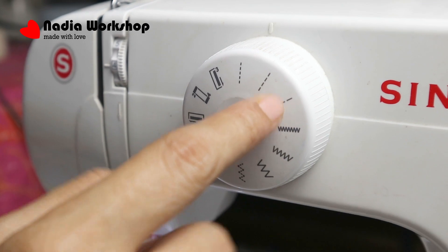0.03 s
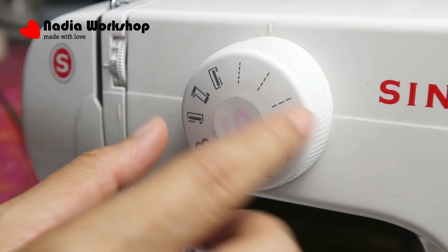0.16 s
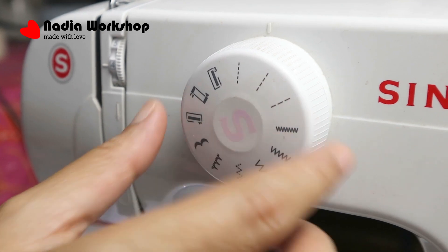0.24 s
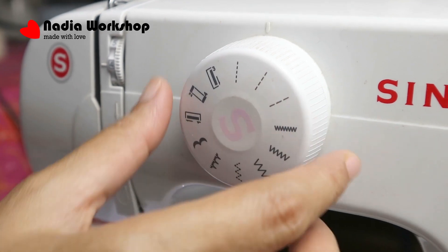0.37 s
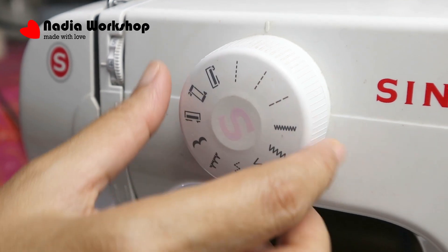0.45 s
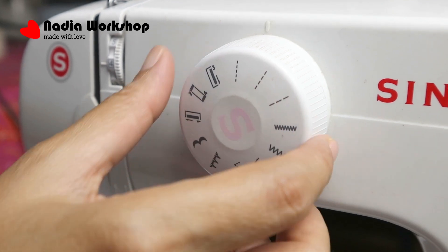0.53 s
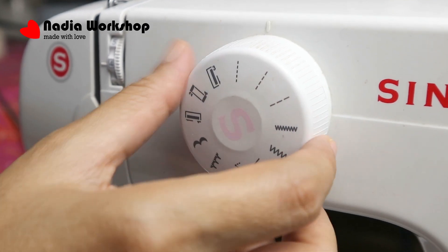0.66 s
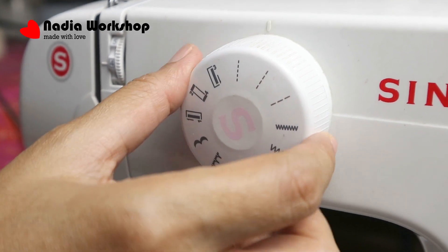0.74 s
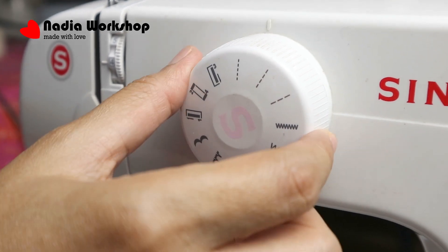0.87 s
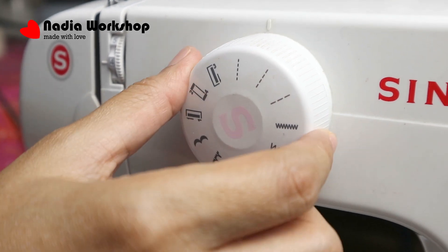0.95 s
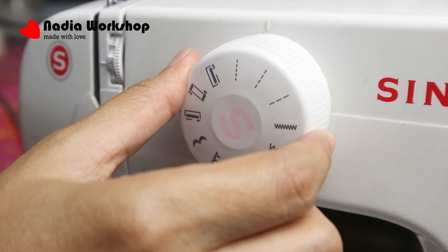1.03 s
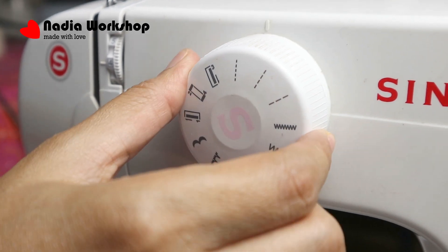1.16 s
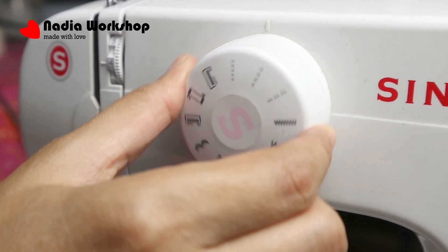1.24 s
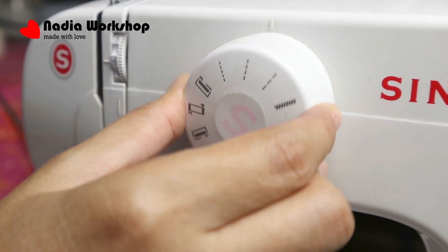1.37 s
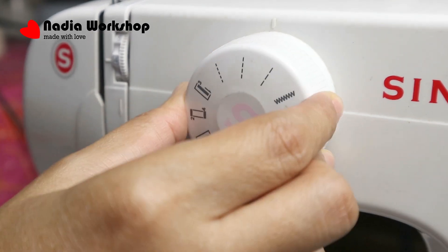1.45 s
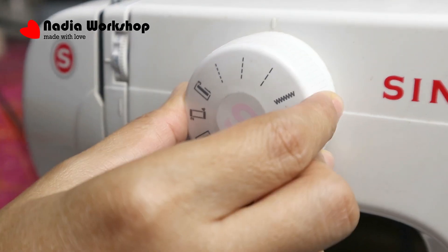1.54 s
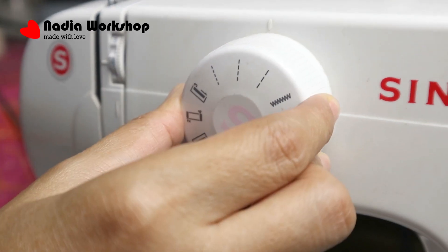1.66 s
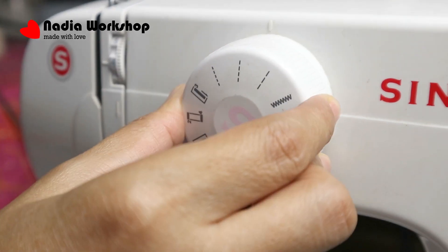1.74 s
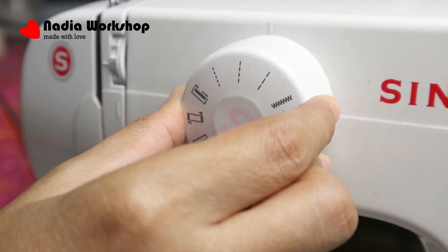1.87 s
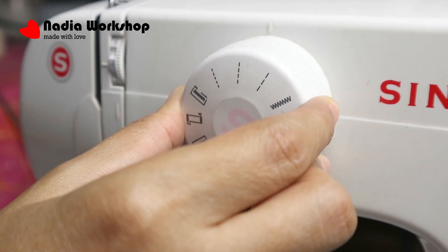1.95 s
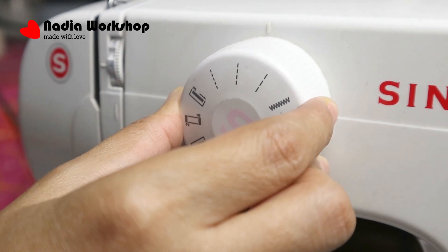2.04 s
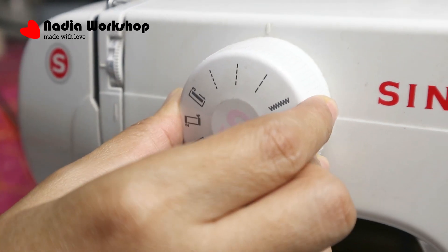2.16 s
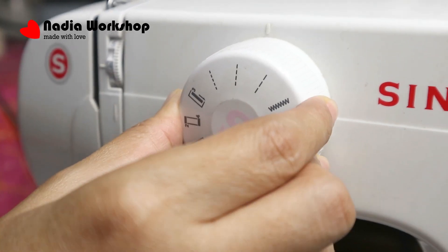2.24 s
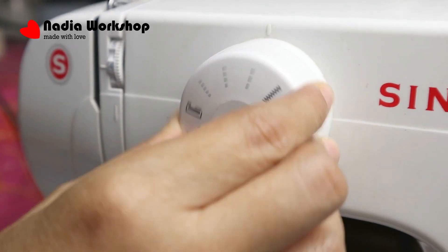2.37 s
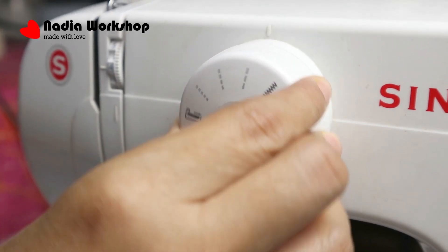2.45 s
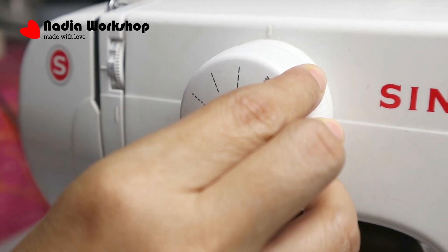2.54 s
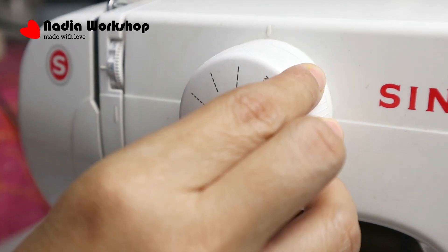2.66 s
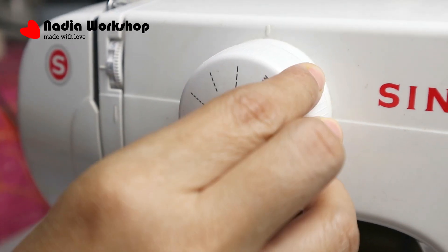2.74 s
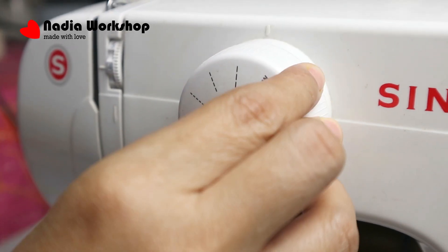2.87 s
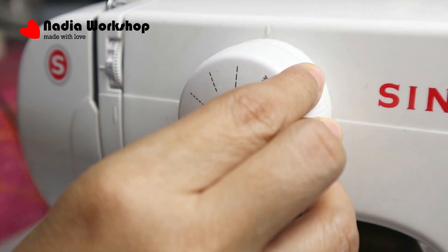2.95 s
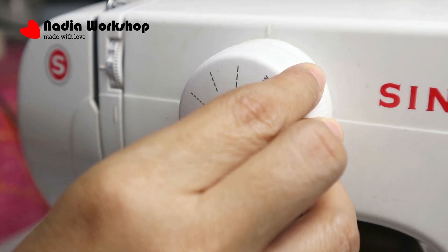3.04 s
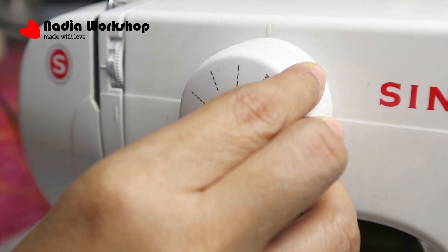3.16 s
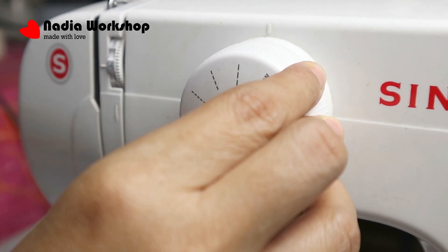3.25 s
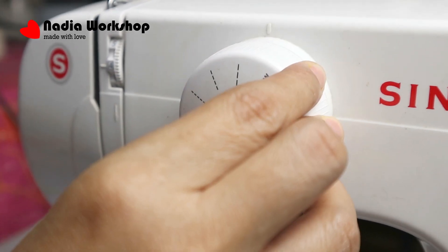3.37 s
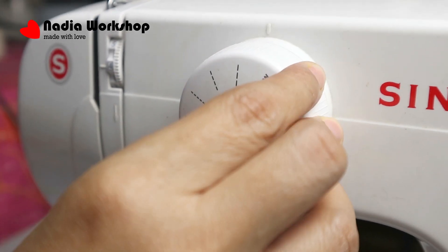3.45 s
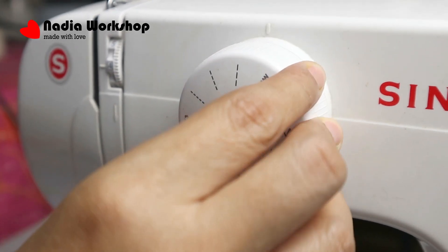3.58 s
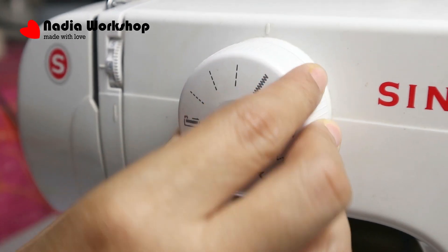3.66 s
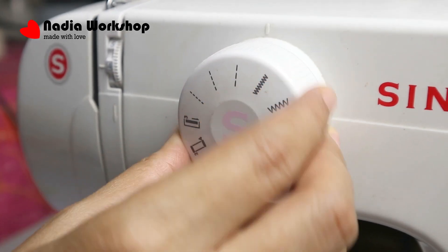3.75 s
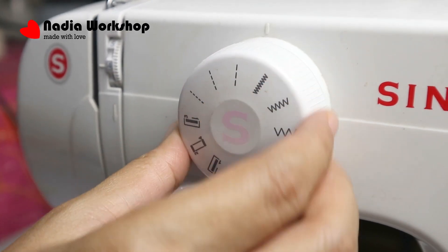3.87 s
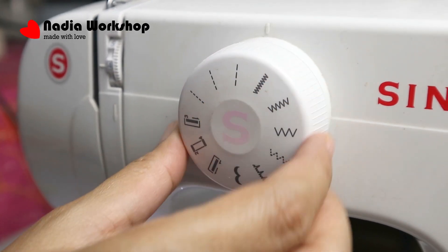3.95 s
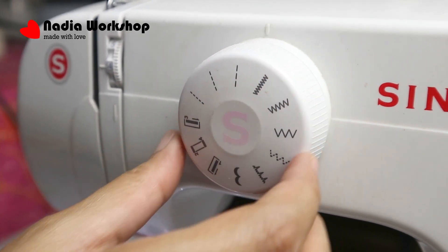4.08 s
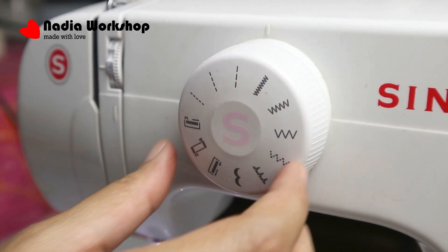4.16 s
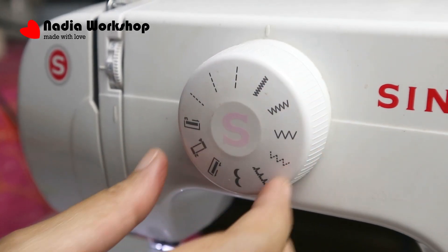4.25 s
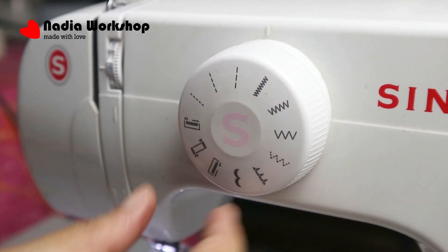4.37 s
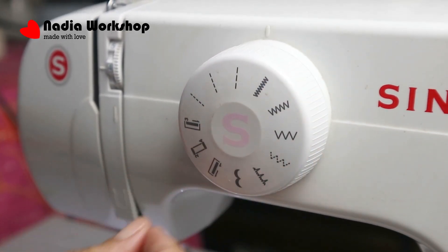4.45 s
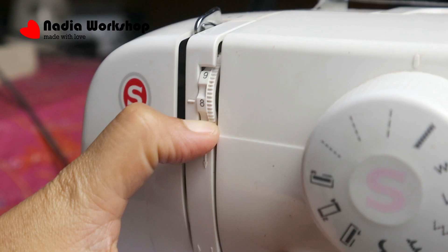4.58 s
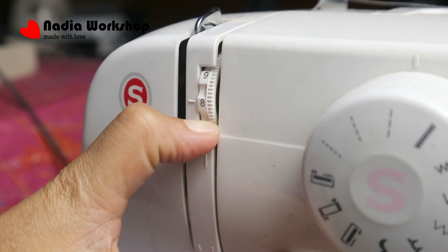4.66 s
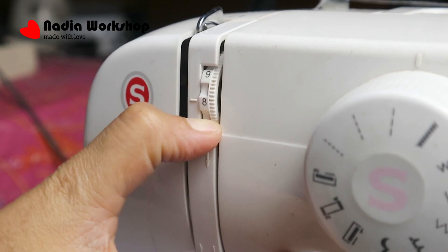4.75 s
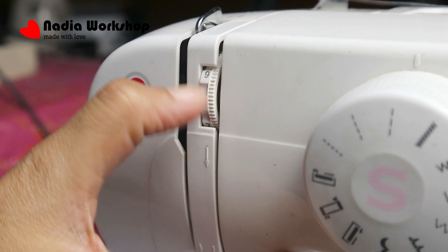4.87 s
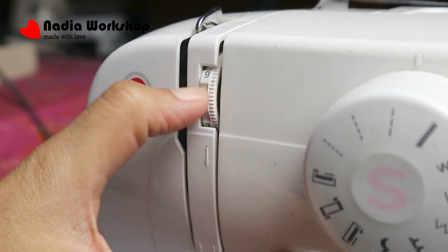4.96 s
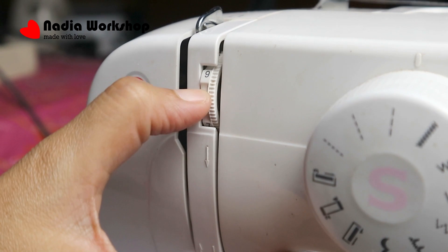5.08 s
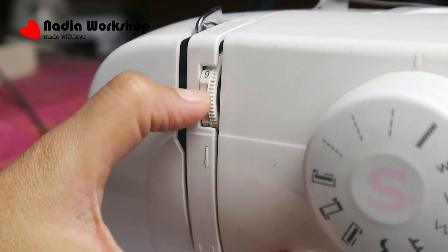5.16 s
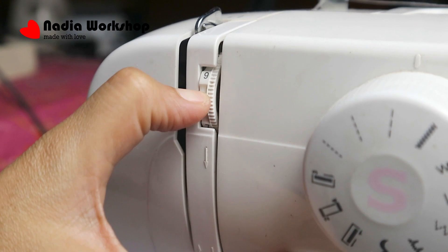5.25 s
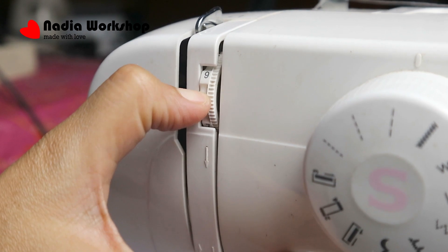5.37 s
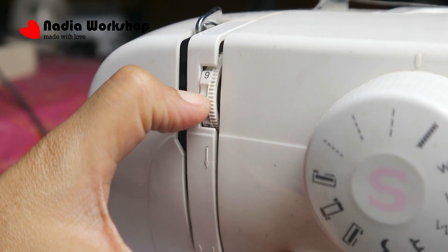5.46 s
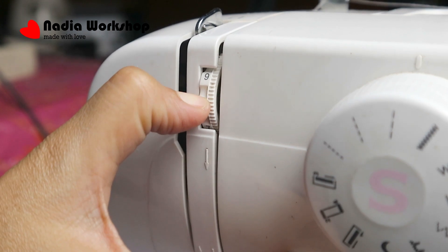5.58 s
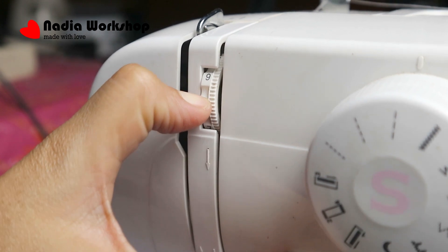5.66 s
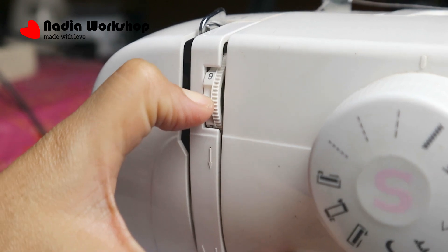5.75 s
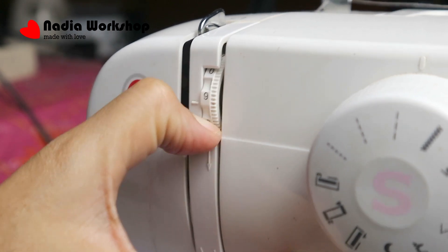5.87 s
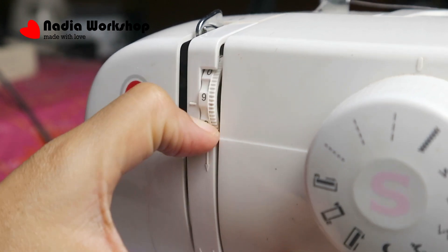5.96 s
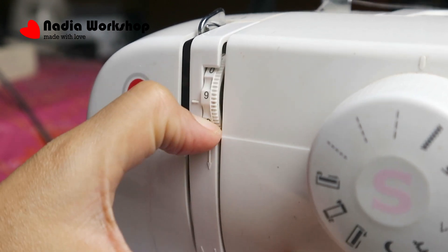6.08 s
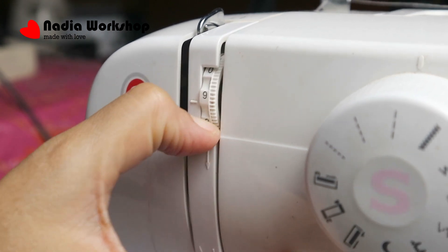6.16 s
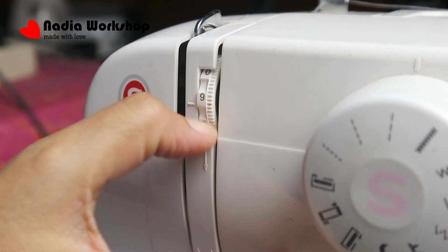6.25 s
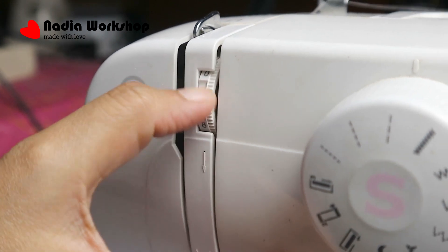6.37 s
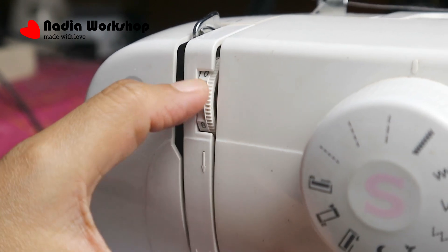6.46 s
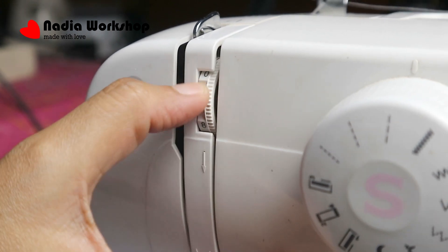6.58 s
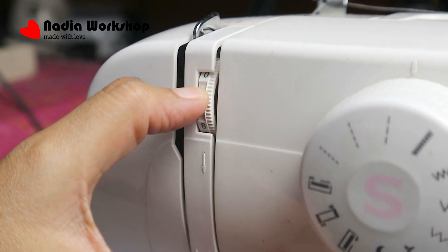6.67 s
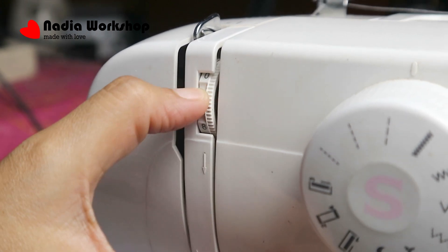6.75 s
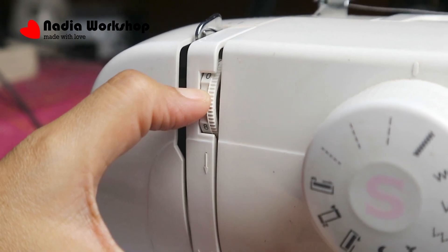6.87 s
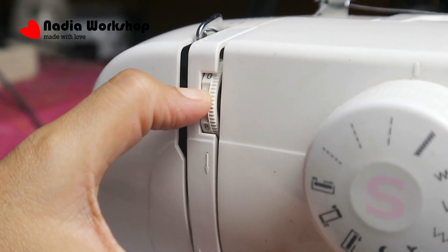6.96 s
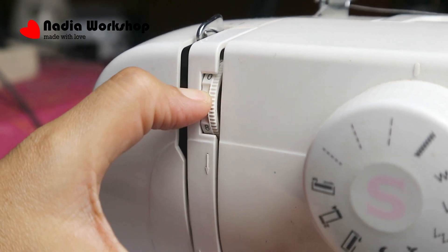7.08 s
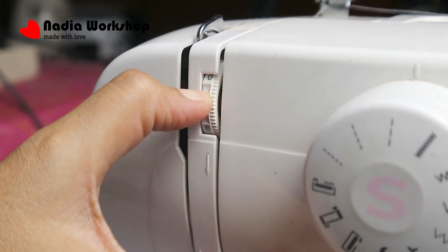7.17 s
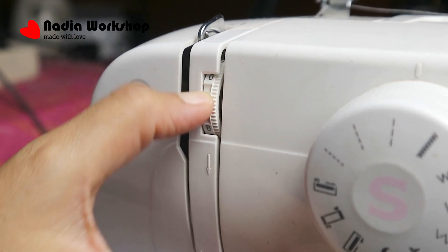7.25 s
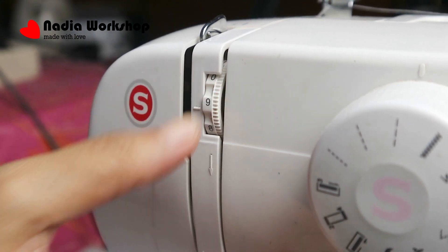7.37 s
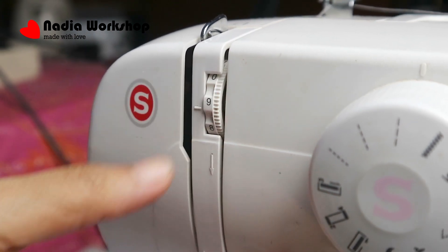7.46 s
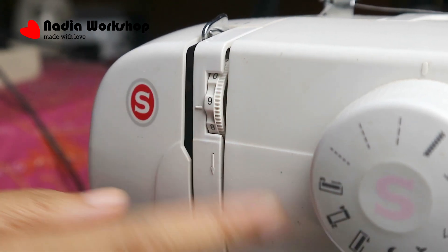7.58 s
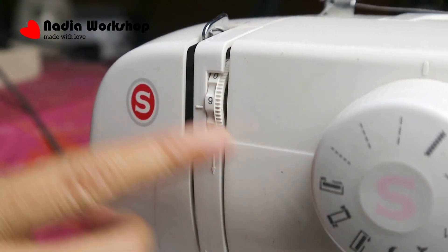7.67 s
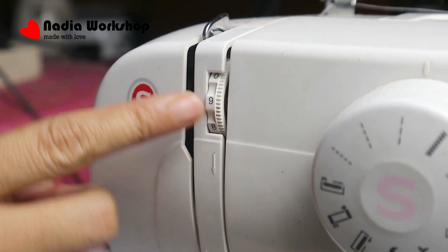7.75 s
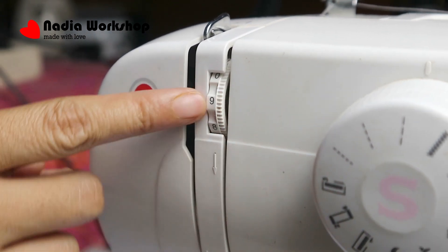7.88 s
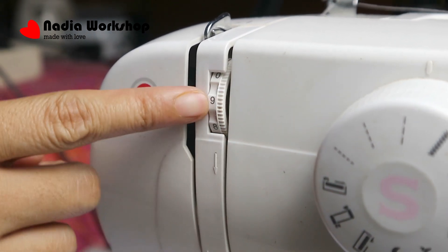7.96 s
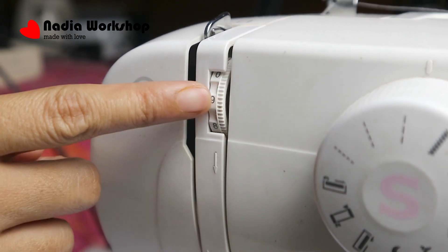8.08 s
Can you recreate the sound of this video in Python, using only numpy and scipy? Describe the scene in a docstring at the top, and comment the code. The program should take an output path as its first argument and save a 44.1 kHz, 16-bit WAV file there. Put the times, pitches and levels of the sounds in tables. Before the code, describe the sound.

A big plastic dial on a sewing machine is turned, close up in a small room: a few hollow, ringing clacks with scuffs, the strongest a bright snap, over airy noise and a wavering low hum. Midway the background abruptly drops. A small thumb wheel then gives light ticks and soft knocks, a sharp squeaky double snap, and a trail of faint clicks.

```python
"""Sewing machine dial and thumb wheel

A hand turns the big plastic dial of a sewing machine, then a small thumb wheel, close to a stereo pair indoors.
Latch blows and scuffs are impacts, chatter and noise ringing shell modes; knocks and squeals are enveloped tones.
A room impulse response spreads them. Behind are coloured noise, a fan's wavering hum, faint ticks and a low drone.
Noise, hum and whirr drop as the dial gives way to the wheel."""
import sys
import numpy as np
from scipy import signal
from scipy.fft import rfft, irfft, next_fast_len
from scipy.io import wavfile
from scipy.ndimage import uniform_filter1d

SR = 44100
rng = np.random.default_rng(int(sys.argv[2]) if len(sys.argv) > 2 else 0)


def store_wav(level_fs):
    """Save 16-bit WAV to argv[1]."""
    pcm = np.round(np.clip(np.atleast_2d(level_fs), -1, 1) * 32767)
    wavfile.write(sys.argv[1], SR, pcm.T.astype(np.int16))


N = 358091
DROP_S = 4.62  # the background drops; the wheel replaces the dial
LN_1000 = np.log(1000)  # 60 dB decay

# shell round the dial: (frequency [Hz], relative level [dB], t60 [s])
DIAL_SHELL_MODES = [(146, -8, 0.081), (205, -18, 0.048), (252, -0.5, 0.21), (302.2, 11, 0.11),
                    (335, 8.5, 0.17), (445.4, -9.5, 0.06), (401.7, 4, 0.22), (549, 5, 0.13),
                    (630, -5, 0.099), (683, 1.5, 0.089), (755, 1, .09), (890, -3, 0.089), (1093, -1.5, .07),
                    (1153, -3, .09), (1320, -5.5, 0.048), (1434, -9.5, 0.11), (1770, -4.5, 0.051),
                    (1915, -9, .06), (2210, -4.5, .02), (2566, 6.5, 0.0038), (2930, 3, 0.02),
                    (3100, 1, 0.023), (3240, -9, 0.011), (3710, -7, 0.033), (3917, -5.5, 0.018),
                    (4044, -3, 0.013), (5490, 14.5, 0.013), (6330, 5, 0.012), (6160, -6, 0.011),
                    (7100, -11.5, 0.0092)]
# wheel and the cover beside it: (frequency [Hz], relative level [dB], t60 [s])
WHEEL_COVER_MODES = [(316, 13.5, 0.051), (406, 2.5, 0.11), (548.3, -6, 0.11), (641, -9, 0.18),
                     (744, 4.5, 0.01), (837, 10, 0.023), (1130, 7, 0.022), (1218, 10.5, 0.05),
                     (1670, 15.5, 0.016), (1720, -8, .04), (2230, -28.5, 0.025), (2627, -9, 0.052),
                     (3180, -4, 0.023), (3430, -12, 0.018), (3740, -0.5, 0.03), (3610, -8, 0.036),
                     (4200, -13, 0.014), (4740, 6, 0.05), (5230, -4, .02), (5570, 1.5, 0.01),
                     (4990, -2, 0.045), (7600, -14, .008)]


def undb(db):
    """Decibels to gain."""
    return 10 ** (np.asarray(db) / 20)


def walk(rate_hz):
    """Random levels held 1 / rate_hz s and slewed twice; spread near 1."""
    hold = int(SR / rate_hz)
    steps = np.repeat(rng.standard_normal(N // hold + 1), hold)
    return 1.4 * uniform_filter1d(uniform_filter1d(steps, hold), hold)[:N]


def air(spectrum, flicker_db, rumble_db):
    """Coloured noise in octave bands, each flickering alone; the lowest also follow the rumble."""
    size = next_fast_len(N)
    hz = np.maximum(np.arange(size // 2 + 1) * SR / size, 1)
    at_hz, db = np.transpose(spectrum)
    shape = rfft(rng.standard_normal(size)) * undb(np.interp(np.log(hz), np.log(at_hz), db))
    scale = np.std(irfft(shape, size))
    out = 0
    for centre_hz in 2. ** np.arange(4, 15):
        weight = np.clip(1 - abs(np.log2(hz / centre_hz)), 0, 1)
        band = irfft(shape * weight, size)[:N]
        out = out + band * undb(flicker_db * walk(9) + rumble_db * (centre_hz < 200))
    return out / scale


def air_mid():
    """Noise common to both ears, with slow changes in its lowest octaves."""
    # noise colour: (frequency [Hz], relative density [dB per Hz])
    spectrum = [(12, -38.5), (20, -6), (55, 5), (141, 1.5), (300, -5.5), (386, -9), (586, -13),
                (753, -14.5), (819, -14), (942, -14.5), (2370, -22), (9030, -32.5), (10700, -53),
                (12600, -38), (15800, -81.5)]
    # gain of the lowest octaves: (time [s], level [dB])
    rumble = [(0, -5), (3, -2), (3.8, -3), (4.6, -1), (5.3, 2), (6.6, -2.5), (8.12, -3)]
    rumble_db = np.interp(np.arange(N) / SR, *np.transpose(rumble))
    return air(spectrum, 0.93, rumble_db)


def air_side():
    """Noise of opposite sign in the two ears."""
    # noise colour: (frequency [Hz], relative density [dB per Hz])
    spectrum = [(12, -58), (20, -36), (53, -17), (145, 1.5), (469, 3.5), (539, -2.5), (819, -3),
                (996, -4.5), (2300, -6.5), (2720, -6.5), (6830, -16.5), (10400, -18), (15800, -27.5)]
    return air(spectrum, 0.32, 0)


def fan():
    """Motor hum: sine lines wavering in level and pitch."""
    # hum lines: (frequency [Hz], rms level before the drop [dB])
    hum = [(96.9, -66.5), (145.3, -58), (188.4, -64.5), (339.1, -63), (387.6, -65), (721.4, -70.5),
           (769.8, -65), (915.2, -69.5), (963.6, -76)]
    out = 0
    for hz, db in hum:
        level = np.sqrt(2) * undb(db + 4.26 * walk(14))
        wavering_hz = hz * (1 + 0.009 * walk(20))
        out = out + level * np.sin(2 * np.pi * np.cumsum(wavering_hz) / SR)
    return out


def ticking(air_db):
    """Tick impulses in even runs, and a patchy noise whirr, ring one small two-mode part."""
    # runs: (first tick [s], ticks [count], spacing [s], impulse level [dB])
    runs = [(1.34, 1, .06, -40), (1.7, 2, .02, -43), (2.028, 4, .1235, -41), (2.06, 4, .1243, -41),
            (3.371, 2, .024, -39), (4.685, 3, .063, -52), (5.024, 2, .035, -53), (5.232, 2, .036, -53),
            (5.331, 2, .069, -53), (5.588, 5, .0615, -52), (6.083, 15, .0631, -50), (7.019, 2, .04, -51),
            (7.158, 1, .06, -51.5)]
    jitter_s, scatter_db, whirr_db = 0.00084, 2, -33.5
    ring_hz, rise_s = 2394, 0.0018
    push = undb(air_db + whirr_db + 4.0 * walk(40) + 1.5 * walk(3.04)) * rng.standard_normal(N)
    for first_s, ticks, spacing_s, db in runs:
        late, loud = rng.standard_normal((round(ticks), 2)).T
        s = first_s + spacing_s * np.arange(len(late)) + jitter_s * late
        push[(s * SR).astype(int)] += undb(db + scatter_db * loud)
    t = np.arange(2000) / SR
    ring = np.sin(2 * np.pi * ring_hz * t) + 0.43 * np.sin(2 * np.pi * 1.21 * ring_hz * t)
    return signal.fftconvolve(push, ring * (t / rise_s) * np.exp(-t / rise_s))[:N]


def blows(events, modes, shell_db, chatter_s, crack_db, scatter_db, chatter_db, tail_db):
    """Each blow is an impact and short chatter ringing reweighted modes, plus a bare crack and noise tail."""
    # edges of the six colour bands: (frequency [Hz])
    edges_hz = [200, 470, 1000, 2000, 3300, 4500, 7500]
    out, t = np.zeros(N + SR), np.arange(int(.25 * SR)) / SR
    hz, mode_db, t60_s = np.transpose(modes)
    group = np.searchsorted(edges_hz, hz) - 1  # modes outside the bands stay silent
    bands = [signal.butter(3, edges_hz[k:k + 2], "band", fs=SR, output="sos") for k in range(6)]
    sheen = signal.butter(2, [edges_hz[-1], 12000], "band", fs=SR, output="sos")
    # treble band centres, in octaves above the tock band
    octaves = np.log2(np.multiply(edges_hz[3:-1], edges_hz[4:]) / np.prod(edges_hz[2:4])) / 2
    for s, db, thud_db, tock_db, hardness, click_db, ting_db in events:
        # harder contact, brighter blow
        treble_db = tock_db + hardness * octaves + shell_db + [click_db, 0, ting_db]
        gains = undb(db + np.append([thud_db, 0, tock_db], treble_db))

        detune, scatter, sign = rng.standard_normal((3, len(hz)))
        rings = np.sin(2 * np.pi * np.outer(hz * (1 + 0.0046 * detune), t))
        rings *= np.exp(-LN_1000 * np.outer(1 / t60_s, t))
        rings *= (undb(mode_db + scatter_db * scatter) * np.where(group > 0, np.sign(sign), 1))[:, None]

        chatter_noise, crack_noise, tail_noise = rng.standard_normal((3, len(t)))
        lumps = np.repeat(tail_noise[::180], 180)[:len(t)]  # uneven bursts of 4 ms
        tail_noise *= undb(3.5 * lumps)
        # a lumpy noise tail fades after each blow
        tail_fade = np.exp(-LN_1000 * t / 0.23)
        here = slice(int(s * SR), int(s * SR) + len(t))
        for k, gain in enumerate(gains):
            x = t / chatter_s * (edges_hz[k] / 1000) ** 0.091  # the treble is over sooner
            head = slice(0, int((chatter_s + .01 + 6 / edges_hz[k]) * SR))
            swell = np.clip(x / .3, 0, 1) * np.exp(-x ** 3)
            # signed squared noise: a few strong impacts among weak ones
            chatter = chatter_noise * abs(chatter_noise) * swell
            # the two low bands and the ting get less chatter beside the single impact
            chatter *= undb(chatter_db - 5.5 * (k < 2) - 8.0 * (k == 5))
            chatter[np.argmax(swell)] += 1  # the single impact
            ring = signal.fftconvolve(rings[group == k].sum(0), chatter)[:len(t)]
            ring = signal.sosfilt(bands[k], ring)
            tail = undb(tail_db) * tail_noise * np.clip(x / 0.16, 0, 1) * tail_fade
            crack = signal.sosfilt(bands[k], crack_noise * swell + tail)
            # ting_db lifts only the ring
            crack_gain = undb(crack_db - ting_db * (k == 5) - 4.5 * (k == 0))
            out[here] += gain * (ring / np.std(ring[head]) + crack_gain * crack / np.std(crack[head]))
        # the snap reaches on above the modes, with the top band's swell and gain
        crack = signal.sosfilt(sheen, crack_noise * swell)
        out[here] += gains[5] * undb(-9.0 - ting_db) * crack / np.std(crack[head])
    return out[:N]


def scuffs():
    """Finger scuffs and scrapes: long chatter on the dial shell, then on the wheel cover."""
    # (time [s], level [dB], thud [dB], tock [dB], hardness [dB per octave], click [dB], ting [dB])
    events = [(0.277, -52.5, -12, 5.5, -18, 6, 0), (1.379, -42.5, 5.5, -4.5, -5.5, -2, 0),
              (2.454, -53.5, 4, -4.5, -3, 3, 15), (2.474, -37, -0.5, -4, -9.5, 1, 18.5),
              (2.498, -49, -13, -6, -3, 5, 4), (4.897, -56, 4, -11, -4, 4.5, -3),
              (5.43, -53.5, 1.5, -5, -3.5, -5, -3), (5.945, -34, 3, -7.5, -10.5, -7, 4),
              (5.897, -42, 0, -2, -11, -6, 4), (5.974, -37.5, -1, 1, -10, -17, 7),
              (6.127, -73.5, 15, 11, -9, 3, 2), (6.445, -66, 9, -5, -7, 2, -12),
              (6.971, -73, 10.5, -18, -10, 0, 0), (7.018, -69.5, 4, -12, -10, 0, 0),
              (7.131, -66.5, 9, -6.5, -15, -0.5, 0), (7.224, -60.5, -9, -10, -12, -1, 0),
              (7.33, -63.5, 1, -7.5, -13, 2, 1.5), (7.505, -65.5, -2, 0.5, -6, -3, 0),
              (7.538, -56, -7, 2, -10.5, -7, -2)]
    out = 0
    for early, modes in ((True, DIAL_SHELL_MODES), (False, WHEEL_COVER_MODES)):
        rows = [row for row in events if (row[0] < DROP_S) == early]
        out = out + blows(rows, modes, shell_db=[-1, 0.5, -8.5], chatter_s=0.022, crack_db=2.5,
                          scatter_db=8.5, chatter_db=14.5, tail_db=-11.5)
    return out


def dial():
    """A spring latch slips off a tooth and snaps home, and fingers knock, ringing the dial's shell."""
    # (time [s], level [dB], thud [dB], tock [dB], hardness above the tock [dB per octave],
    #  click near 2.6 kHz [dB], ting near 5.5 kHz [dB]); all but the time and level are relative
    events = [(1.362, -34.5, -5, -2.5, -6.5, -2.5, -16), (1.523, -28.5, 7, 3, -5, 5.5, 5),
              (2.154, -63, 13, -10, 2, 0, 0), (2.202, -46.5, 3.5, -1, -8.5, -2, 2),
              (2.221, -54, 12, -5.5, -1.5, 2, 3), (2.483, -33, 1, -8, -9, -12, -2),
              (2.527, -50, -3, -11, -2.5, -2, -4), (2.609, -18.5, 3, 0.5, -7.5, 1.5, 13.5),
              (3.823, -41, 5.5, -8.5, -5, -2.5, 3), (3.927, -61, -11, 9, 0.5, 3, 2),
              (3.961, -47, 9.5, -18, -10, -2, 0), (4.103, -44, 2, -3, -3, -1, 4)]
    return blows(events, DIAL_SHELL_MODES, shell_db=[1.5, 1, -2], chatter_s=.0085, crack_db=1.0,
                 scatter_db=4.5, chatter_db=2.5, tail_db=-11.0)


def squeals():
    """A rubbed spring sings: a rough tone that starts at once, glides and fades."""
    # (start [s], length [s], from [Hz], to [Hz], level before roughness [dB])
    events = [(1.366, .075, 3710, 4440, -45.5), (2.51, 0.11, 2180, 2150, -47),
              (5.932, 0.12, 4870, 4950, -44), (5.967, 0.05, 3630, 3640, -42),
              (7.535, 0.057, 2500, 2400, -53)]
    out, t = 0, np.arange(N) / SR
    rough, waver = undb(6 * walk(500)), 1 + .025 * walk(500)
    for s, length_s, from_hz, to_hz, db in events:
        x = np.clip((t - s) / length_s, 0, 1)
        envelope = np.clip(x / 0.14, 0, 1) * (1 - x) ** 1.5
        glide_hz = (from_hz + (to_hz - from_hz) * x) * waver
        out = out + undb(db) * envelope * np.sin(2 * np.pi * np.cumsum(glide_hz) / SR)
    return rough * out


def drone():
    """A faint low sine swells three times: each rises quickly, sags and dies away."""
    # swells: (start [s], length [s], frequency [Hz], rms level before the sag [dB])
    swells = [(4.653, 0.23, 180.5, -48), (4.933, 0.41, 181, -53.5), (5.45, 0.32, 205, -58.5)]
    edge_s, sag_db = 0.048, -8.5
    out, t = 0, np.arange(N) / SR
    for s, length_s, hz, db in swells:
        edge = np.clip(np.minimum(t - s, s + length_s - t) / edge_s, 0, 1)
        level = undb(db + sag_db * np.clip((t - s) / length_s, 0, 1))
        out = out + edge * level * np.sin(2 * np.pi * hz * t)
    return np.sqrt(2) * out


def wheel():
    """Clicks of the thumb wheel: short blows that ring it and the cover beside it."""
    # (time [s], level [dB], thud [dB], tock [dB], hardness [dB per octave], click [dB], ting [dB])
    events = [(4.888, -44.5, -6, -16, -8, 0, -6.5), (4.907, -49.5, -3, -13, -0.5, 7, 2),
              (4.919, -53.5, 10.5, -8, -9, 0, -1), (4.993, -54.5, -6, -12, 1, 0, -4),
              (5.366, -54, -10, -14, -9, 0, 0), (5.377, -54, -7, -14, -7, 1, 1),
              (5.429, -43, -12.5, -10.5, 1, 1, -0.5), (5.689, -49.5, -9, -18, -2, 0, 0),
              (5.883, -25.5, -15.5, -8, 0.5, 3, -17), (5.927, -33.5, -13, -1.5, -0.5, 8, 7),
              (5.930, -22, -6.5, -2, -5.5, -5, 3), (5.937, -31.5, 7.5, -19, -14, 0, 6),
              (5.989, -38.5, 0, 1.5, -6.5, -4, 8), (6.112, -54.5, 1, -11, -9, 0, 0),
              (6.148, -63.5, 11, -10, -9, 0, 0), (6.316, -58.5, 8.5, -14, -9, 4, 1),
              (6.438, -63, 3, 4.5, -4.5, 5, -8), (6.699, -59, -4.5, -0.5, -10.5, -2, -4),
              (6.899, -61.5, -6, 3, -7, 0, -1), (6.956, -50.5, -11, -12, -11, 0, 0),
              (6.999, -46.5, -13.5, -12, -12, 2, 1), (7.105, -64, -8, 0, -2, 7, 0),
              (7.111, -44, -12, -5.5, -7, 2, -6), (7.205, -53.5, -4, -17, -5, 1, 2),
              (7.315, -61, -3, -14, -3, -6, -1), (7.484, -66, 7, -3, -10, -1, 3),
              (7.538, -53, -14, -10, 7, 7, -7)]
    return blows(events, WHEEL_COVER_MODES, shell_db=[-7, -4, -9.5], chatter_s=0.00619, crack_db=-3.5,
                 scatter_db=2.5, chatter_db=-3.0, tail_db=-16.0)


def knocks():
    """Soft thumb knocks on the wheel's teeth: one small part swells and stops within milliseconds."""
    # (time [s], frequency [Hz], peak level before the room [dB])
    events = [(4.891, 1720, -41.5), (4.905, 1715, -42), (4.911, 1730, -33.5), (4.928, 1740, -53),
              (5.366, 1700, -53), (5.377, 1700, -51), (5.470, 1680, -49), (5.487, 1660, -55),
              (6.126, 1600, -45), (6.438, 1540, -45), (6.958, 1685, -42), (7.001, 1690, -40.5),
              (7.113, 1675, -34), (7.132, 1710, -49), (7.141, 1670, -50)]
    rise_s = 0.0018
    out, t = np.zeros(N), np.arange(1500) / SR
    for s, hz, db in events:
        envelope = t / rise_s * np.exp(1 - t / rise_s)
        out[int(s * SR):int(s * SR) + len(t)] += undb(db) * np.sin(2 * np.pi * hz * t) * envelope
    return out


def room(x):
    """Direct sound, a dulling noise tail swelling in at once, and one wall echo; differs by ear."""
    t60_s, tail_db, dull_hz = 0.2, -10, 1500
    treble_t60_s, treble_db, early_db = 0.12, -5, 1.5
    wall_s, wall_db, wall_dull_hz = 0.023, -7.5, 596
    t = np.arange(int(.5 * SR)) / SR
    # the tail is slightly stronger before the wall echo
    fill = np.where(t < wall_s, undb(early_db) * np.clip(t / 0.0073, 0, 1), 1)
    bass, treble, side = rng.standard_normal((3, len(t))) * fill
    low, high = (signal.butter(1, dull_hz, kind, fs=SR, output="sos") for kind in ("low", "high"))
    treble_fade = np.exp(-LN_1000 * t / treble_t60_s)
    mid = signal.sosfilt(low, bass) * np.exp(-LN_1000 * t / t60_s)
    mid += undb(treble_db) * signal.sosfilt(high, treble) * treble_fade
    # an even tail: narrow spectral peaks are trimmed to their surroundings
    spectrum = rfft(mid)
    even = np.sqrt(uniform_filter1d(abs(spectrum) ** 2, size=150)) / np.maximum(abs(spectrum), 1e-9)
    mid = irfft(spectrum * np.minimum(even, 1), len(t))
    mid *= np.clip(t / .003, 0, 1) * np.exp(-(t / .2) ** 4)
    side = signal.sosfilt(high, side) * treble_fade  # close ports agree in the bass
    mid *= undb(tail_db) / np.sqrt(np.sum(mid ** 2))
    side *= undb(-12) / np.sqrt(np.sum(side ** 2))
    mid[0] += 1  # direct sound
    # the wall returns the thud
    wall = 1. * (np.arange(len(t)) == int(wall_s * SR))
    wall_low = signal.butter(2, wall_dull_hz, fs=SR, output="sos")
    mid += undb(wall_db) * signal.sosfilt(wall_low, wall)
    side[[2, 5]] += undb(-18.5) * np.array([-1, 1])  # direct sound reaches one port a little later
    return np.array([signal.fftconvolve(x, mid + ear * side)[:N] for ear in (1, -1)])


def scene():
    """Stereo background plus the machine in the room."""
    air_before_db, air_after_db, settle_db, settle_s = -47.5, -57, 5, 0.086
    t = np.arange(N) / SR
    settling_db = air_after_db + settle_db * np.exp(-abs(t - DROP_S) / settle_s)
    air_db = np.where(t < DROP_S, air_before_db, settling_db)
    mid = undb(air_db) * air_mid() + undb(air_db - air_before_db) * fan() + ticking(air_db) + drone()
    side = undb(air_db - 3.5) * air_side()
    machine = scuffs() + dial() + squeals() + wheel() + knocks()
    return mid + np.array([side, -side]) + undb(-5.5) * room(machine)


def record(dry):
    """A steep elliptic low-pass removes the top above 15.94 kHz."""
    return signal.sosfilt(signal.ellip(12, .2, 90, 15940, fs=SR, output="sos"), dry)


dry = scene()
out = record(dry)
store_wav(out)
```